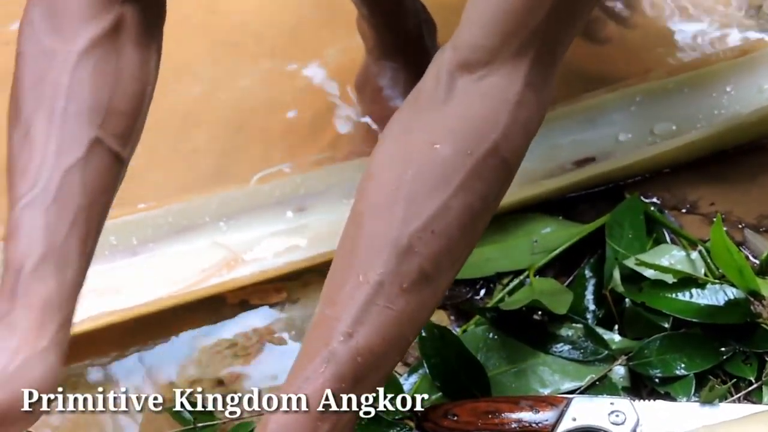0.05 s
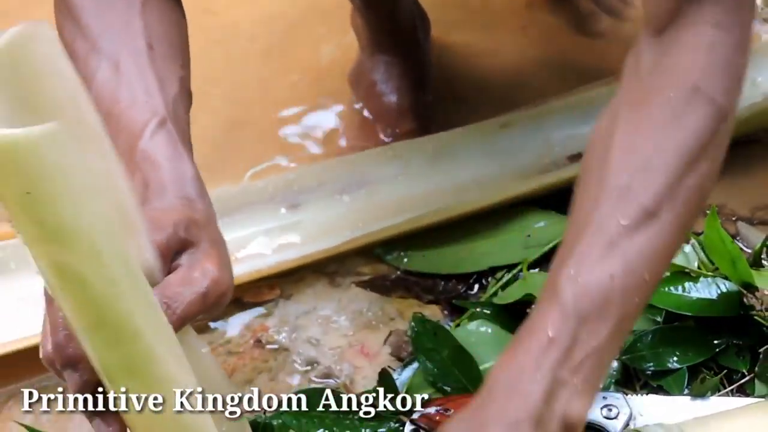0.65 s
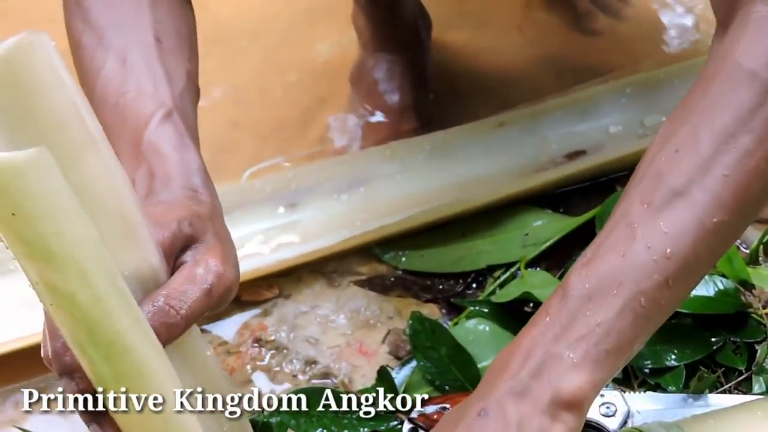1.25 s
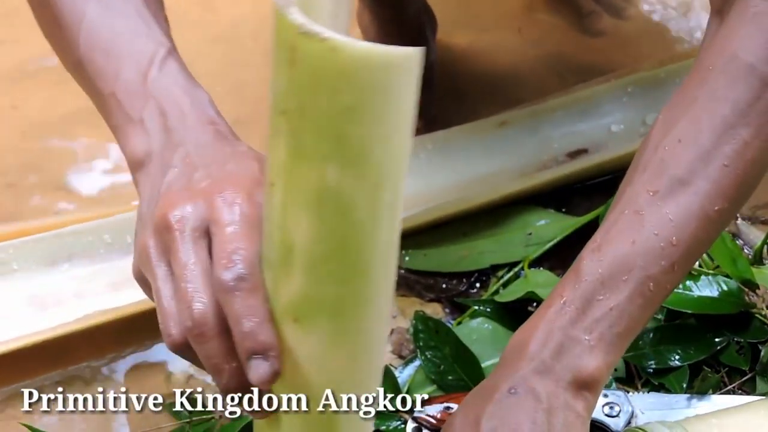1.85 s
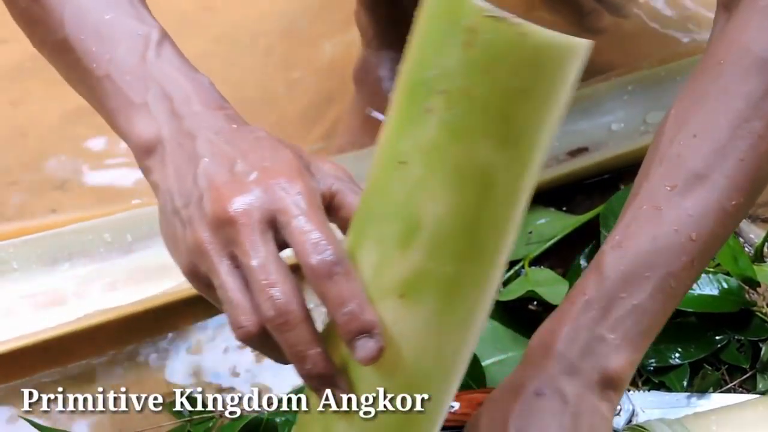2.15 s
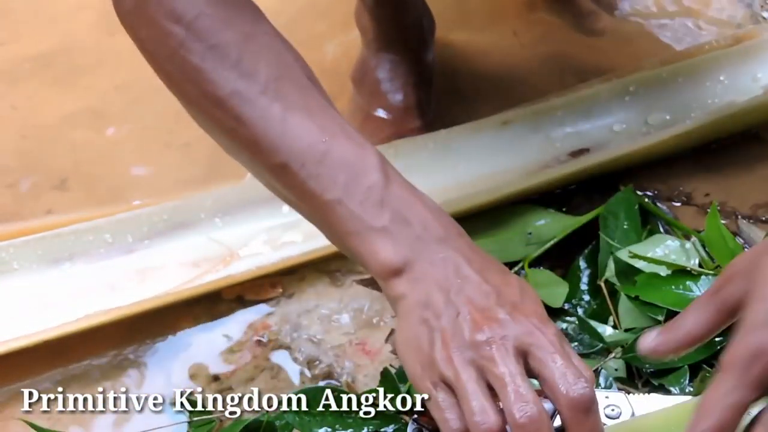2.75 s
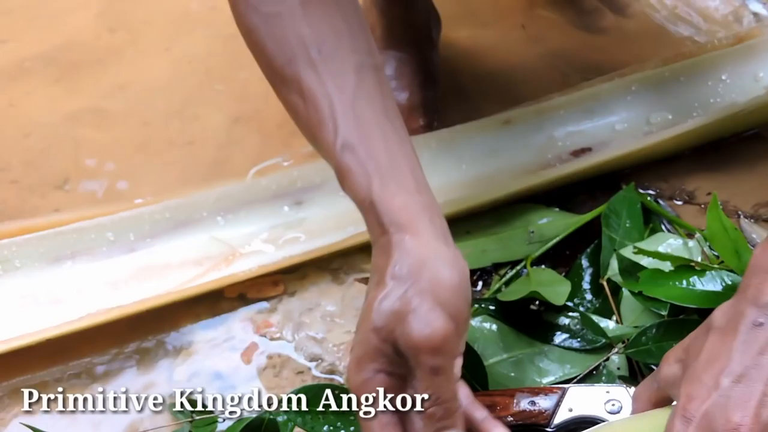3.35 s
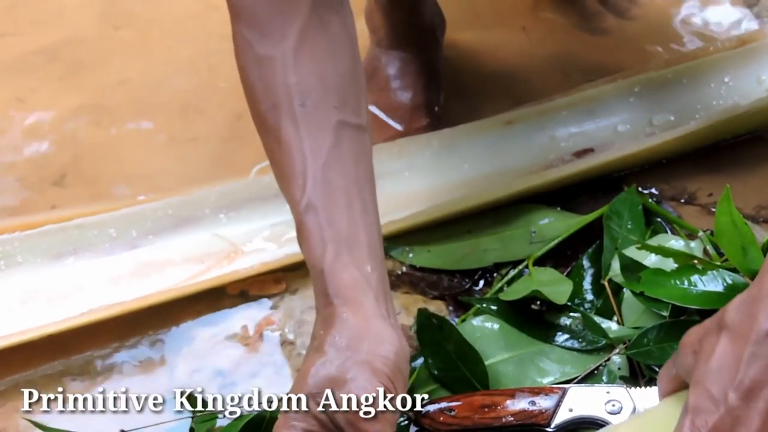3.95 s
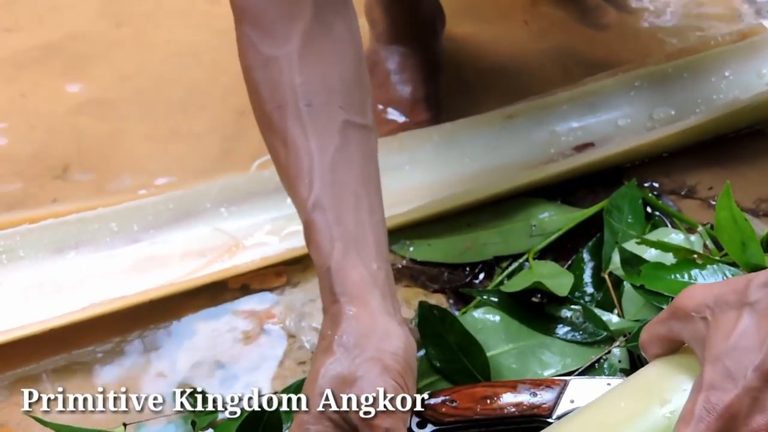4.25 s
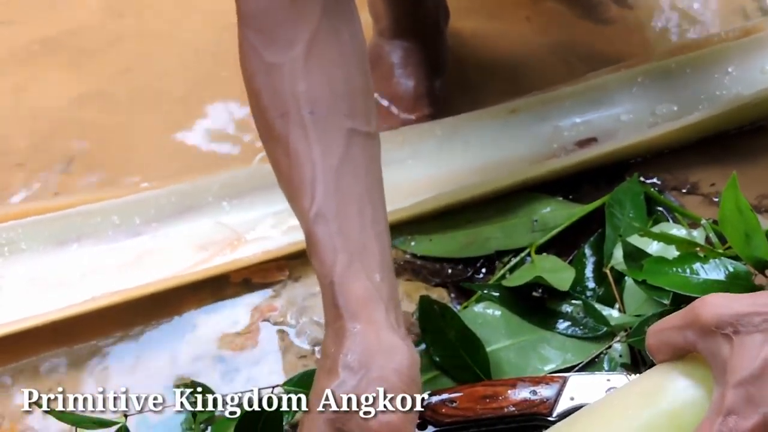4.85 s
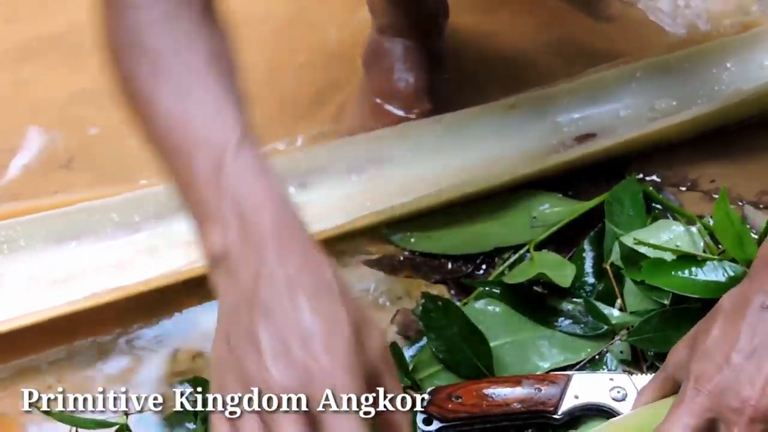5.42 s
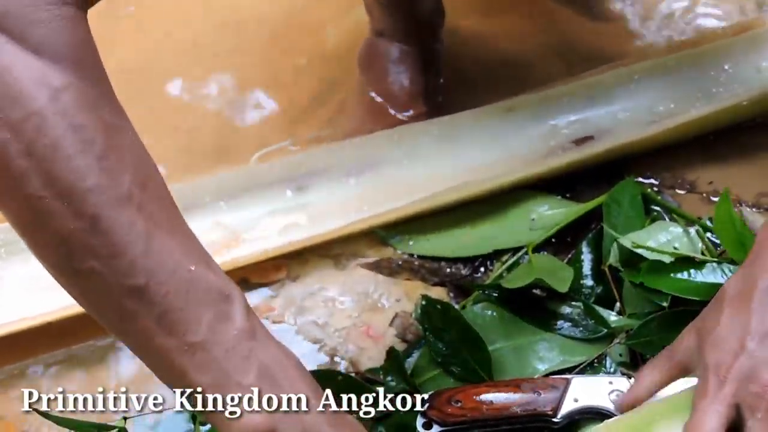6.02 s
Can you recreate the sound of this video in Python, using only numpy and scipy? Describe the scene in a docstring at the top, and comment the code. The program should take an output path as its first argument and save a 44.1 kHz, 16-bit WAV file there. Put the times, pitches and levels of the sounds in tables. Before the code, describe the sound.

A wet, hollow banana-trunk sheath is handled close to a stereo microphone. Behind it, a shallow stream trickles evenly over a low rumble, and insects drone at a high pitch from the right. At the start, fibres crackle over a leaf rustle, with the sharpest snap at about 0.2 seconds. A palm slides with a brief soft hiss at 1 second, and tiny wet ticks follow just before 2. From 2.5 seconds, clicks and crumpling leaves lead to a damp, hollow thump at 2.7 as the sheath is set down. The insects die away, restart unsteadily at 3.1 and recover by 3.5, when another crisp click sounds. A faint tick and rustle come at 4.2. Between 5 and 5.4 seconds the sheath judders under a hand with quick small knocks, clicks and a faint rubbing groan. A last snap and light knock fall near 5.8.

```python
"""A wet, hollow banana-trunk sheath, turned by hand close to a camera's stereo microphone.
Its crisp fibres snap; it brushes and ticks over wet leaves, is set down with a damp thump that rings
its hollow, and later judders under a hand. Further off, insects drone from the right with their
clicking tymbals, pausing once. The spot is beside a shallow stream, trickling over a low rumble."""
import sys
import numpy as np
from scipy import signal
from scipy.fft import rfft, irfft, next_fast_len
from scipy.io import wavfile
from scipy.ndimage import uniform_filter1d, map_coordinates

SR = 44100
rng = np.random.default_rng(int(sys.argv[2]) if len(sys.argv) > 2 else 0)


def file_out(sig):
    """Save sig as 16-bit WAV at sys.argv[1]."""
    # one column per channel
    cols = np.atleast_2d(sig).T
    # limit, then scale
    lim = np.clip(cols, -1, 1)
    pcm = np.round(lim * 32767).astype(np.int16)
    wavfile.write(sys.argv[1], SR, pcm)


N = 268128

# fibres snap and leaves tick: t/s, relative level/dB, body/dB, crack f/Hz, fizz/dB
FIBRE_SNAPS = [(0.0264, -8, 5, 4770, 6.5), (.050, -27, -15, 6400, 8), (0.0965, -16.5, 4, 4500, -1),
               (0.124, -20.5, -2, 4570, 2), (0.1387, -24, -12, 4300, -16), (0.165, -27, -6, 5500, 4),
               (0.172, -24.5, -10, 6600, 9), (0.203, -17.5, -21, 4400, -22),
               (0.229, -0.8, -9.5, 5270, -3.5), (0.2507, -20.5, -19, 5250, 1), (2.546, -21.5, -8, 5200, -1),
               (2.568, -23, -10, 4300, 1), (2.577, -23, -8, 3000, 0), (2.585, -25, -9, 3300, -4),
               (2.594, -31, -6, 2400, -8), (2.608, -28, -12, 2650, -14), (2.619, -29, -12, 2900, -14),
               (2.641, -28, 7, 2900, 7), (2.6843, -20.5, -31, 3140, -20), (2.691, -15, -12, 3130, 1),
               (2.709, -26, -8, 2700, -16), (3.052, -34, -14, 3700, -4), (3.346, -31, -10, 3500, -10),
               (3.4718, -19, -15, 4000, 11.5), (4.157, -28, 1, 2940, -1), (4.9736, -29, 8, 4000, -1),
               (5.0146, -24, -4, 3940, -3), (5.041, -31.5, -8, 2600, -6), (5.137, -24, -9, 2500, -5),
               (5.157, -28, -6, 2300, -8), (5.1715, -24.5, -7, 2920, -7), (5.181, -30, -3, 2300, -8),
               (5.357, -29.5, -4, 3750, -15), (5.726, -30, -14, 3300, -14), (5.831, -17, -6, 3680, 0)]
# spectrum of a snap's body: f/Hz, level/dB
SNAP_BODY = [(150, -10), (420, -17), (670, 3.5), (900, -19), (1250, 1.5), (1600, 2.5), (1950, -8.5),
             (2450, -7.5), (2950, -2), (3400, -7), (4200, -11), (9000, -43)]
# spectrum of a snap's wet spray: f/Hz, level/dB
SNAP_FIZZ = [(2000, -23), (7500, -19.5), (10000, -7), (11800, -8), (14000, -11.5), (16000, -28)]
# resonances of the hollow sheath: f/Hz, width/Hz, level/dB
SHEATH_MODES = [(212, 22, 3.5), (247, 28, 7.5), (287.6, 41, 11), (403, 47, 2.5), (553, 41, -2),
                (648, 64, 8), (982, 110, 2), (1130, 44, -4), (1500, 78, -18), (1594, 71, -2),
                (2920, 320, -17.5)]
# soft blows on the sheath: t/s, relative level/dB, lowest f/Hz, highest f/Hz
SOFT_BLOWS = [(2.580, -21.5, 500, 950), (2.642, -28.5, 180, 900), (2.660, -23, 500, 1000),
              (2.666, -23.5, 500, 950), (2.692, -16.5, 450, 850), (2.697, -21, 150, 400),
              (2.709, -9.5, 165, 1270), (2.7122, -13.5, 188, 900), (2.735, -28, 150, 450),
              (5.162, -20, 450, 850), (5.226, -22.5, 550, 900), (5.293, -28, 550, 800),
              (5.344, -24, 600, 800), (5.73, -27, 600, 800), (5.831, -18, 650, 900)]
# runs of quick knocks under the hand: start t/s, end t/s, gap/s, first knock's relative level/dB
JUDDER_RUNS = [(5.080, 5.133, .0152, -21), (5.132, 5.137, .0152, -22), (5.176, 5.188, 0.0066, -21)]
# a hand drags on the sheath: t/s, length/s, level/dB
HAND_DRAGS = [(2.715, 0.04, -50.5), (5.04, 0.16, -52.5), (5.11, 0.034, -42), (5.255, 0.083, -56)]
# spectrum of the slipping skin's force: f/Hz, level/dB
SKIN = [(150, -11), (215, -8), (275, -4), (450, 1), (700, -2.5), (1000, -8), (3000, -20), (8000, -22)]
# spectrum of the sliding palm: f/Hz, level/dB
PALM_HISS = [(700, -31), (1700, -5.5), (3600, -12), (5000, -14), (12000, -24)]
# wet leaves brush and crumple: strongest t/s, half length/s, relative level/dB
LEAF_BRUSHES = [(.17, 0.13, -53), (1.83, .13, -71), (2.547, .012, -54), (2.59, 0.095, -47),
                (2.714, 0.042, -46.5), (4.206, 0.049, -58), (5.11, 0.16, -53.5), (5.292, 0.051, -57),
                (5.87, 0.45, -65.5)]
# spectrum of the leaves: f/Hz, level/dB
LEAF_CRACKLE = [(400, -3), (1000, -22), (1800, 3.5), (2900, 5), (5000, 2), (8000, -0.5), (13000, -1.5),
                (15500, -18)]
# films of water part under the fingers: t/s, relative level/dB
FILM_TICKS = [(1.6916, -45), (1.716, -42), (1.7554, -45), (1.8073, -41), (1.8154, -45), (1.8502, -42),
              (1.8692, -42), (1.948, -51), (1.9734, -44), (4.2033, -48), (4.2258, -49), (4.557, -43),
              (4.9891, -38), (5.0624, -41), (5.247, -50), (5.894, -46), (6.0362, -47)]
# spectrum of a parting film: f/Hz, level/dB
FILM = [(2000, -34), (7000, -13), (10000, 4), (11800, 7), (14000, 0), (16000, -16)]
# the insects' tymbal resonances: f/Hz, width/Hz, level/dB
TYMBAL_BANDS = [(3750, 2500, -16.5), (4930, 180, -2.5), (5180, 160, -6), (5680, 160, -6), (5930, 120, 0),
                (6230, 270, -5.5), (6690, 250, -4.5), (6950, 210, -1), (7394, 190, 1), (7690, 180, 2.5),
                (8010, 176, 1), (8350, 240, -3.5), (8660, 170, -5.5), (9200, 200, -7.5), (9580, 1130, -14)]
# spectrum of the stream's wash: f/Hz, level/dB
STREAM_WASH = [(90, -1), (170, 0), (280, -1), (360, -4), (430, -1.5), (510, -8.5), (670, -5), (850, -9),
               (1100, -7.5), (1500, -10), (3000, -10.5), (5000, -13.5), (9000, -15), (15000, -26)]
# the stream's balance at the microphone: f/Hz, left over right/dB
STREAM_LEAN = [(150, -1), (400, -0.5), (800, 4.5), (1500, 1.5), (2200, 0), (6000, -2), (13000, -1)]
# spectrum of the rumble: f/Hz, level/dB
AIR_RUMBLE = [(11, -16), (18, 2), (38, -3.5), (59, 5), (79, -1.5), (118, -10.5), (139, -11), (200, -39),
              (260, -14.5), (440, -120)]
# the rumble swells: strongest t/s, half length/s, rise/dB
RUMBLE_SWELLS = [(0.503, 0.24, 4.5), (1.61, 0.061, 4), (2.362, 0.039, 6.5), (2.97, 0.089, 7.5),
                 (4.343, 0.046, 4), (4.587, 0.36, 2.5), (5.545, 0.05, 10)]
# left-right likeness of diffuse noise: f/Hz, correlation/0-1
LIKENESS = [(100, 0.9), (300, 0.33), (1000, 0.35), (2000, 0.21), (4000, 0)]


def snaps(give_s=0.001103, echo_s=0.0021, echo=0.22, far_db=-20, gain_db=6, octaves=0.71):
    """Close up, a fibre bends, breaks and takes its neighbours along; the wet ground answers at once."""
    out, f = np.zeros((2, N)), np.fft.rfftfreq(1024, 1 / SR)
    for s, db, body_db, hz, fizz_db in FIBRE_SNAPS:
        ragged = np.clip(0.93 * (1 - amp(db - 0.5) ** 2), .05, .97)  # weak snaps tear, strong ones break
        clean = np.sqrt(1 - ragged)
        burst = np.sqrt(ragged) * scatter(t60=0.023, alike=0.63)
        burst += amp(far_db) * scatter(t60=0.21, alike=0.17)
        burst[[0, 1], [0, 1]] += clean  # the direct crack reaches the left capsule a sample sooner
        burst[:, round(echo_s * SR)] += echo * clean
        fibre = 1 / (1 + (np.log2((f + 1) / hz) / octaves) ** 4)
        body = amp(body_db + along(SNAP_BODY, f))
        fizz = amp(fizz_db + along(SNAP_FIZZ, f))
        crack = pulse(np.sqrt(fibre ** 2 + body ** 2 + fizz ** 2))
        add(out, s + give_s, amp(db + gain_db) * signal.fftconvolve(burst, crack[None], axes=1))
    return panned(out, left_db=-1.5)


def hollow(x):
    """The ring of the sheath's curved wall and the air inside it."""
    return filtered(x, lambda f: sum(amp(db) * 1j * f * width / (hz * hz - f * f + 1j * f * width)
                                     for hz, width, db in SHEATH_MODES))


def blow(low_hz, top_hz, loose=0.39):
    """A soft contact and a loose rattle; a light touch wakes little bass, a fleshy one little treble."""
    force = loose * scatter(t60=0.038, alike=0.82)
    force[:, 0] -= 1
    flesh = signal.butter(3, top_hz, fs=SR, output="sos")
    touch = signal.butter(4, low_hz, "high", fs=SR, output="sos")
    return signal.sosfilt(np.vstack([flesh, touch]), force)


def thumps(give_s=0.00074, grow_db=0.7, judder_hz=(243, 890)):
    """Single blows, and judders that grow from knock to knock, ring the hollow sheath."""
    knocks = [(s, db + grow_db * k, *judder_hz)
              for start, end, gap, db in JUDDER_RUNS for k, s in enumerate(np.arange(start, end, gap))]
    blows = np.zeros((2, N))
    for s, db, low_hz, top_hz in SOFT_BLOWS + knocks:
        add(blows, s + give_s, amp(db) * blow(low_hz, top_hz))
    return hollow(blows) / np.abs(hollow(signal.unit_impulse(N))).max()


def drag(slip_hz=139):
    """Wet skin sticks and slips on the sheath in a faint groan."""
    cycles = np.cumsum(slip_hz * np.exp(.1 * wobble(90))) / SR
    slips = np.diff(np.floor(cycles), prepend=0) * amp(1.7 * wobble(60))
    hiss = 0.065 * rng.standard_normal(N) + 0.34 * rng.standard_normal((2, N))
    force = coloured(unit(slips) + hiss, SKIN)
    push = sum(amp(db) * stroke(s, length, attack_s=0.0088, release_s=0.0027)
               for s, length, db in HAND_DRAGS)
    return push * unit(hollow(force))


def palm(level_db=-48):
    """A palm slides once along the wet sheath with a soft hiss."""
    push = stroke(start_s=1.015, length_s=0.063, attack_s=0.017, release_s=0.026)
    return panned(amp(level_db) * push * rush(PALM_HISS, patchy_db=1.0), left_db=-2.5)


def leaves(grains_per_s=5000, spread_db=3.5, gain_db=-1, rest_db=-69):
    """Wet leaves under the sheath crackle in clumps of tiny grains, tick, and never lie quite still."""
    grains = (rng.random((2, N)) < grains_per_s / SR) * rng.choice([-1, 1], (2, N))
    grains = grains * amp(spread_db * np.minimum(rng.standard_normal((2, N)), 2))
    clumps = amp(3.6 * np.minimum(wobble(140), 1.5))
    crackle = coloured(grains + 0.14 * grains[::-1], LEAF_CRACKLE) * clumps  # a little crosses sides
    motion = sum(amp(db) * swell(s, half_length) for s, half_length, db in LEAF_BRUSHES)
    return panned((amp(rest_db) + amp(gain_db) * motion) * crackle + wet_ticks(motion), left_db=-1.0)


def wet_ticks(motion, top_per_s=40, stray_db=-34, spread_db=3, gain_db=11, give_s=.0015):
    """Films of water part with fine ticks: a few clear ones, and strays wherever the leaves move."""
    strength = (motion / motion.max()) ** 0.3
    strays = (rng.random(N) < top_per_s / SR) * strength
    strays *= amp(stray_db + spread_db * np.clip(rng.standard_normal(N), -2, 2))
    ticks = signal.fftconvolve(strays[None], scatter(t60=.016, alike=0.32), axes=1)[:, :N]
    for s, db in FILM_TICKS:
        add(ticks, s + give_s, amp(db + gain_db) * scatter(t60=.016, alike=.5))
    spray = pulse(amp(along(FILM, np.fft.rfftfreq(1024, 1 / SR))))
    return signal.fftconvolve(ticks, spray[None], axes=1)[:, :N]


def tymbal_bands(f, ripple_db=2.5):
    """Countless tymbal clicks blur into bands, finely ridged by a faint random ripple."""
    power = sum(amp(db) ** 2 / (1 + 2 * ((f - hz) / width) ** 2) ** 2 for hz, width, db in TYMBAL_BANDS)
    teeth_hz = np.arange(0, SR / 2, 20)
    return np.sqrt(power) * amp(ripple_db * np.interp(f, teeth_hz, rng.standard_normal(len(teeth_hz))))


def insects(level_db=-48, lag_s=.000075, pause_s=2.68, run_down_s=0.23, resume_s=3.1, start_up_s=.44):
    """A chorus off to the right runs down, restarts low and unsteady, and climbs back with effort."""
    t = np.arange(N) / SR
    delay_s = np.array([[lag_s], [0]])  # the nearest singers reach the right capsule first
    near = filtered(rng.standard_normal(N), lambda f: tymbal_bands(f) * np.exp(-2j * np.pi * f * delay_s))
    far = filtered(rng.standard_normal((2, N)), tymbal_bands)
    song = np.sqrt(0.5) * (unit(near) + unit(far))
    effort = np.clip(1 - (t - pause_s) / run_down_s, 0, 1) + np.clip((t - resume_s) / start_up_s, 0, 1)
    resumed = t > resume_s
    pitch_sag = .2 * resumed * (1 - effort) ** 2 * (1 + .5 * wobble(150))
    clock = np.cumsum(1 - pitch_sag) - 1
    chorus = np.array([map_coordinates(side, [clock]) for side in song])
    gain = effort * amp(level_db + 0.7 * resumed + 0.43 * wobble(10))  # a little louder after the rest
    return panned(gain * chorus, left_db=-4.0)


def stream(wash_db=-50.5, bubble_db=-61):
    """Shallow water washes and trickles at an even flow, its gurgle a little left of the microphone."""
    water = amp(wash_db) * rush(STREAM_WASH, patchy_db=1.44) + amp(bubble_db) * bubbles()
    return filtered(water, lambda hz: panned(1, left_db=along(STREAM_LEAN, hz)))


def bubbles(count=1800, pitch_hz=850, cycles=6, spread_db=4):
    """A crowd of small bubbles rings and rises in pitch at the stream's surface."""
    out, t = np.zeros((2, N)), np.arange(SR // 30) / SR
    for when, (pitch, size, side) in zip(rng.random(count), rng.standard_normal((count, 3))):
        hz = np.clip(pitch_hz * np.exp(.65 * pitch), 250, 5000)
        age = t * hz / cycles
        rise = 1 + 0.075 * np.minimum(age, 1)
        ring = np.sin(2 * np.pi * hz * t * rise) * np.exp(-2 * age) * (1 - np.exp(-10 * age))
        add(out, when * N / SR, panned(amp(spread_db * min(size, 2)) * ring, left_db=3.1 * side))
    return unit(out)


def rumble(level_db=-50, restless_db=0.1):
    """A low rumble in the air behind everything, with brief swells."""
    rise_db = sum(db * swell(s, half_length) for s, half_length, db in RUMBLE_SWELLS)
    gain = amp(level_db + rise_db + restless_db * wobble(7.15))
    return panned(gain * rush(AIR_RUMBLE, patchy_db=0.5), left_db=-2.0)


def rush(spectrum, patchy_db):
    """Stereo noise of rms 1 with patches of random gain, near mono in the bass."""
    def mid_side(hz):
        angle = np.arccos(along(LIKENESS, hz)) / 2
        return np.array([np.cos(angle), np.sin(angle)])
    cells = signal.stft(rng.standard_normal((2, N)), nperseg=512)[2]
    patches = uniform_filter1d(rng.standard_normal(cells.shape[1:]), size=5, axis=0)
    patches = uniform_filter1d(patches, size=9, axis=1)
    pair = signal.istft(cells * amp(patchy_db * unit(patches)), nperseg=512)[1][:, :N]
    mid, side = filtered(pair, mid_side)
    return coloured(np.array([mid + side, mid - side]), spectrum)


def scatter(t60, alike):
    """A spray of close reflections with energy 1 a side, partly common to both capsules."""
    t = np.arange(SR // 6) / SR
    common = np.sqrt(alike) * rng.standard_normal(len(t))
    apart = np.sqrt(1 - alike) * rng.standard_normal((2, len(t)))
    spray = (common + apart) * amp(-60 * t / t60)
    return spray / np.linalg.norm(spray, axis=1, keepdims=True)


def pulse(gain):
    """The shortest causal pulse of energy 1 with this spectral shape."""
    cepstrum = irfft(np.log(gain + 1e-6))
    half = len(cepstrum) // 2
    cepstrum[1:half] *= 2
    cepstrum[half + 1:] = 0
    shape = irfft(np.exp(rfft(cepstrum)))
    return shape / np.linalg.norm(shape)


def stroke(start_s, length_s, attack_s, release_s):
    """The gain of one hand movement: it builds up, holds and dies away."""
    t = np.arange(N) / SR - start_s
    return np.clip(t / attack_s, 0, 1) * np.exp(-np.maximum(t - length_s, 0) / release_s)


def swell(s, half_length):
    """A smooth rise to 1 at time s, and the fall after it."""
    return np.exp(-((np.arange(N) / SR - s) / half_length) ** 2)


def wobble(rate):
    """A smooth random curve, rate knots a second."""
    return map_coordinates(rng.standard_normal(int(N * rate / SR) + 4), [np.arange(N) * rate / SR])


def filtered(x, response):
    """x times a complex response of frequency."""
    size = next_fast_len(N + SR // 2)
    return irfft(rfft(x, size) * response(np.fft.rfftfreq(size, 1 / SR)), size)[..., :N]


def coloured(x, spectrum):
    """x given a spectrum, at rms 1."""
    return unit(filtered(x, lambda hz: amp(along(spectrum, hz))))


def along(points, hz):
    """A curve through (f/Hz, value) points on a log axis."""
    f, values = np.transpose(points)
    return np.interp(np.log(hz + 1), np.log(f + 1), values)


def add(track, s, sound):
    """Mix a sound into a track at time s."""
    i = max(0, round(s * SR))
    track[..., i:i + sound.shape[-1]] += sound[..., :max(0, N - i)]


def panned(x, left_db):
    """Left louder than right by left_db."""
    return x * amp([[left_db / 2], [-left_db / 2]]).reshape(2, -1)


def amp(db):
    """Decibels to gain."""
    return 10 ** (np.asarray(db) / 20)


def unit(x):
    """Scaled to rms 1."""
    return x / np.sqrt(np.mean(x ** 2) + 1e-20)


def scene():
    """The handling close in front of the microphone, insects and water behind."""
    handling = snaps() + panned(thumps() + drag(), left_db=0.5) + leaves() + palm()
    return handling + insects() + stream() + rumble()


def record(dry, top_hz=15600):
    """The camera keeps nothing above its band limit."""
    return filtered(dry, lambda hz: hz < top_hz)


dry = scene()
out = record(dry)
file_out(out)
```